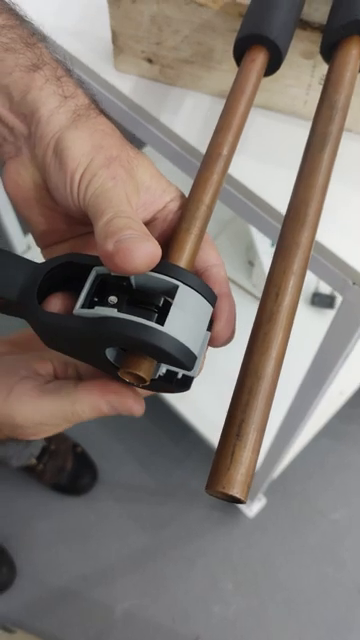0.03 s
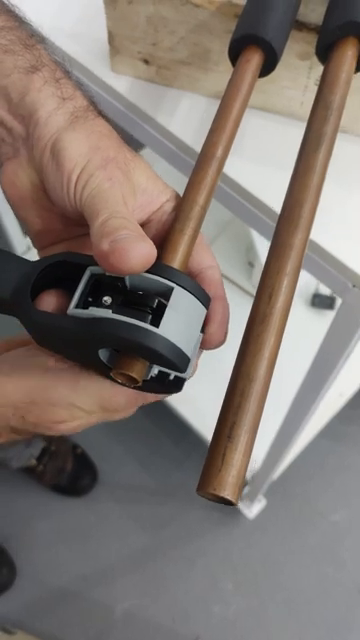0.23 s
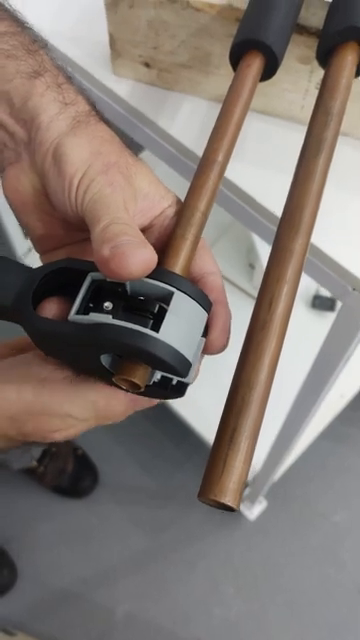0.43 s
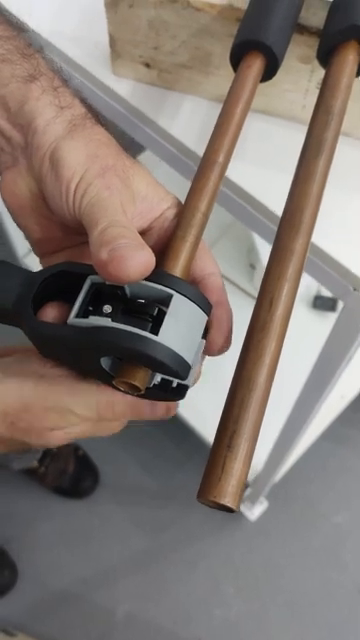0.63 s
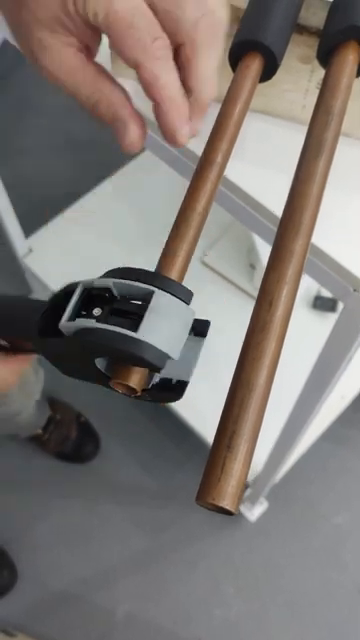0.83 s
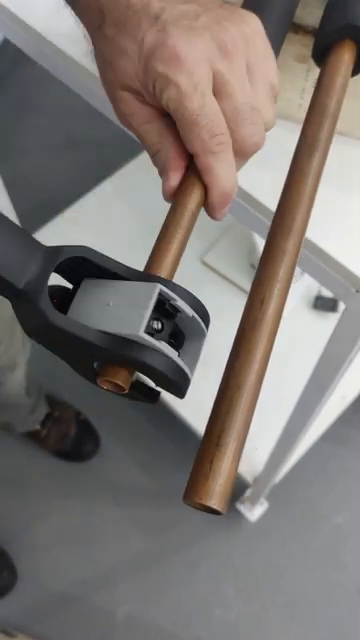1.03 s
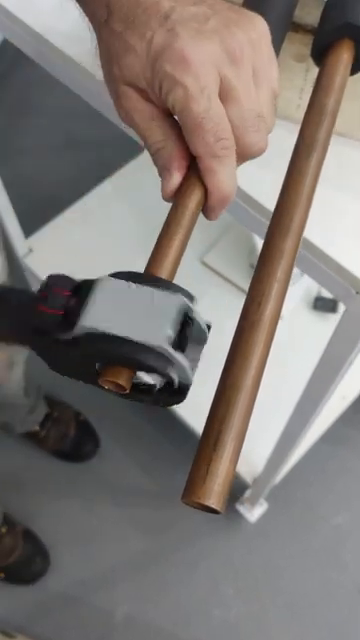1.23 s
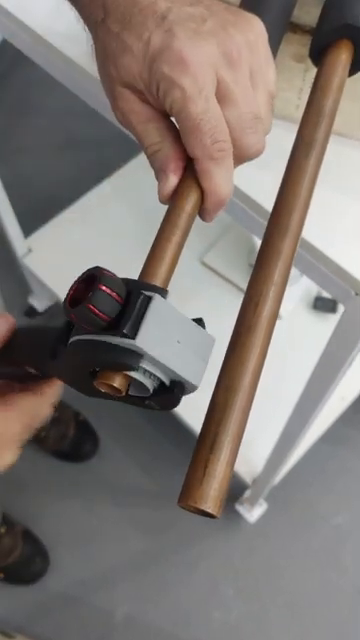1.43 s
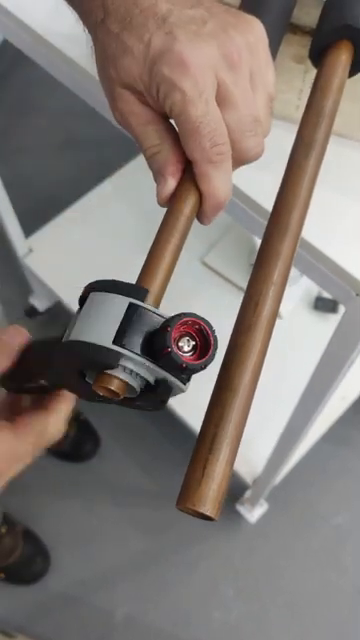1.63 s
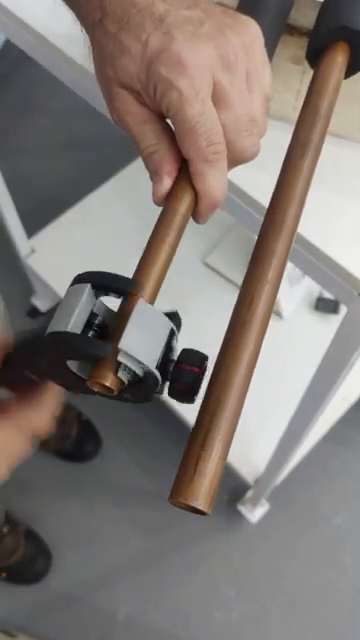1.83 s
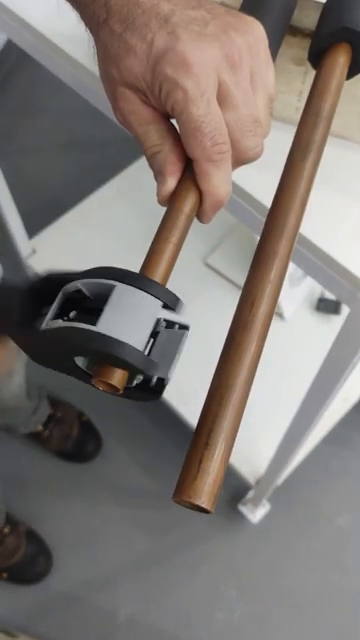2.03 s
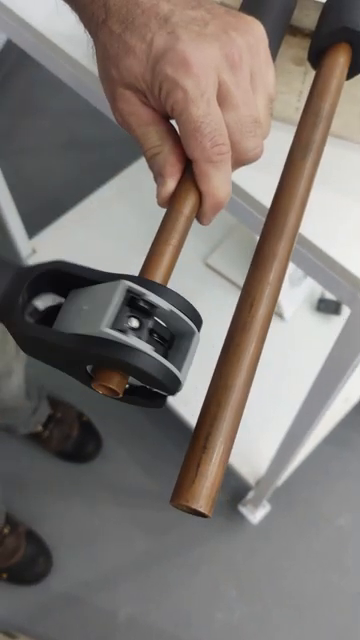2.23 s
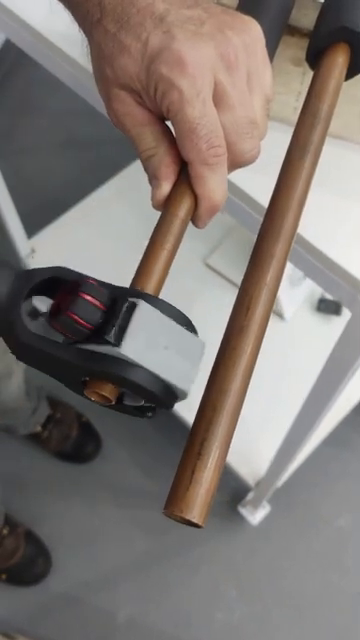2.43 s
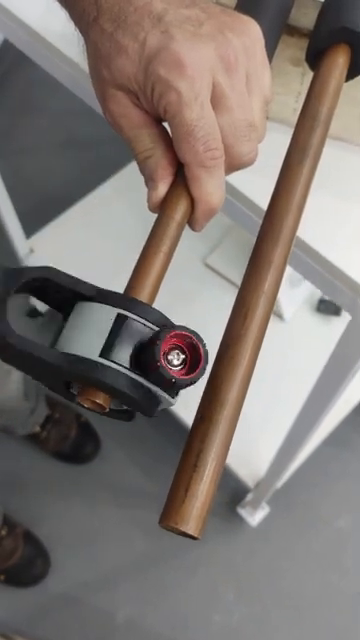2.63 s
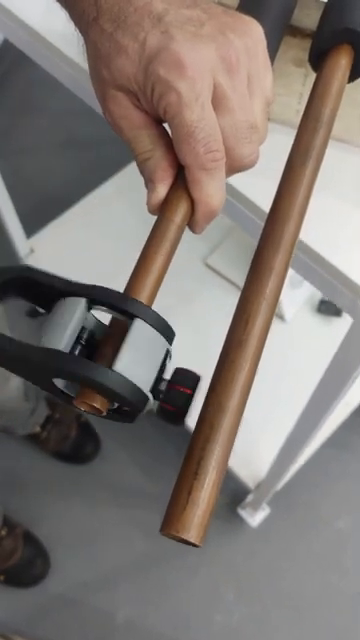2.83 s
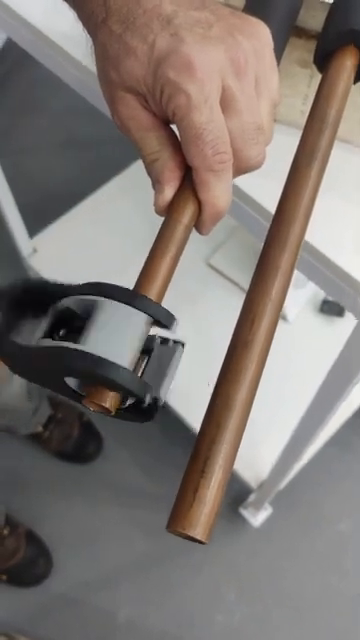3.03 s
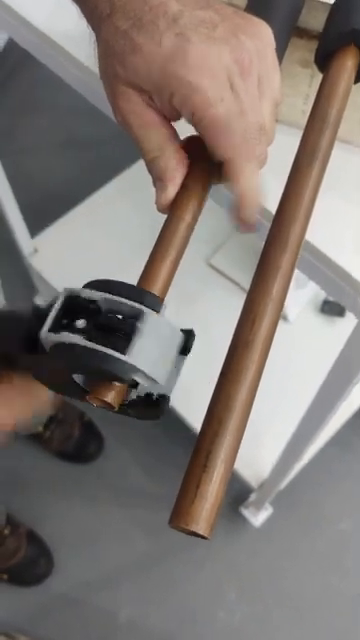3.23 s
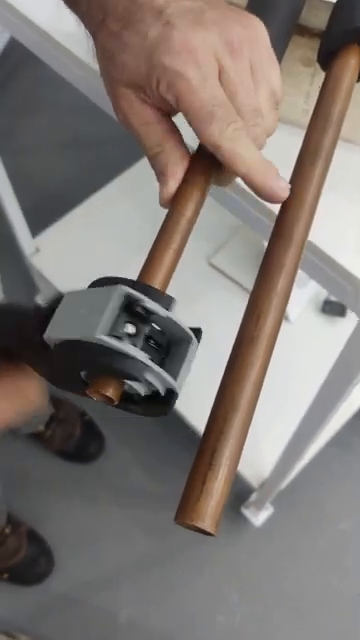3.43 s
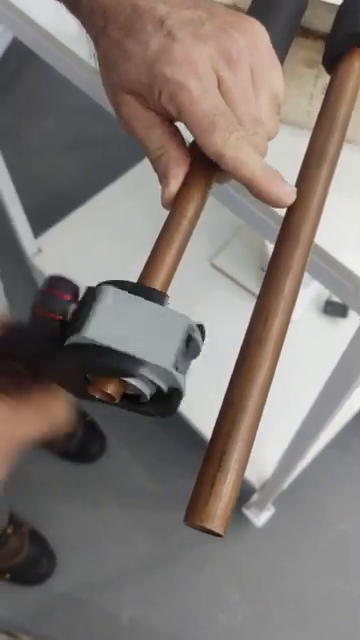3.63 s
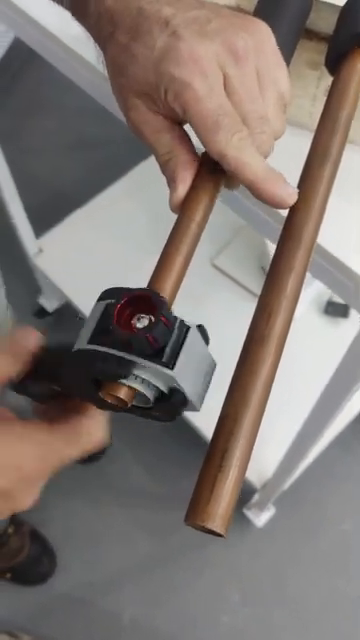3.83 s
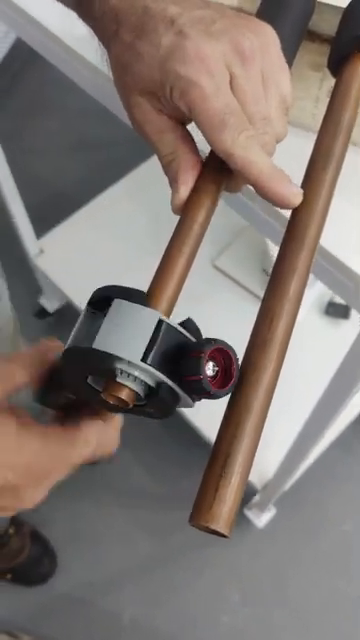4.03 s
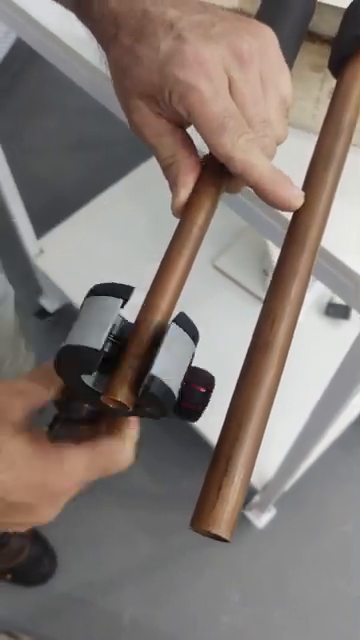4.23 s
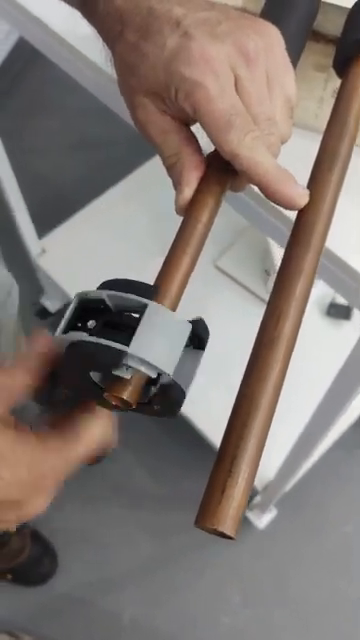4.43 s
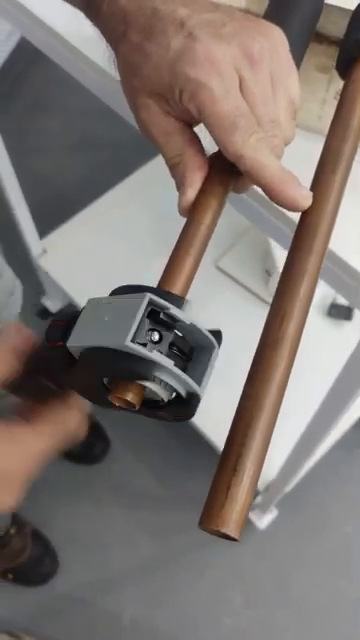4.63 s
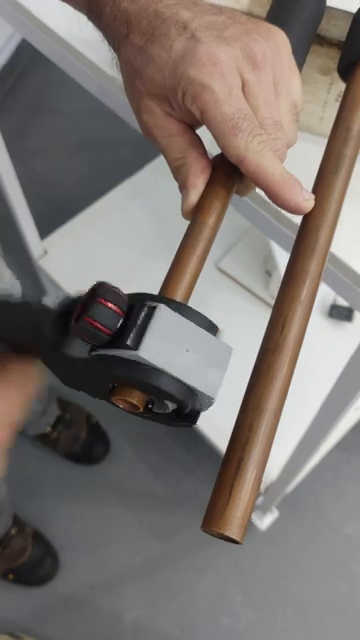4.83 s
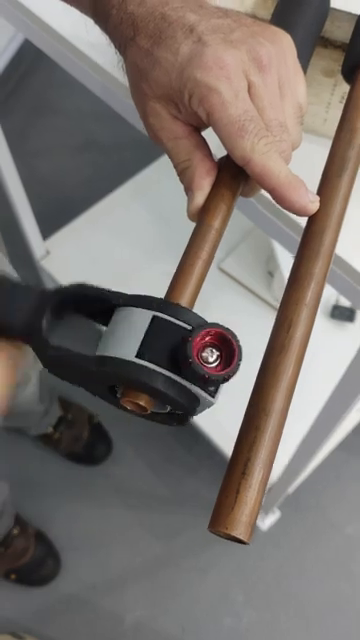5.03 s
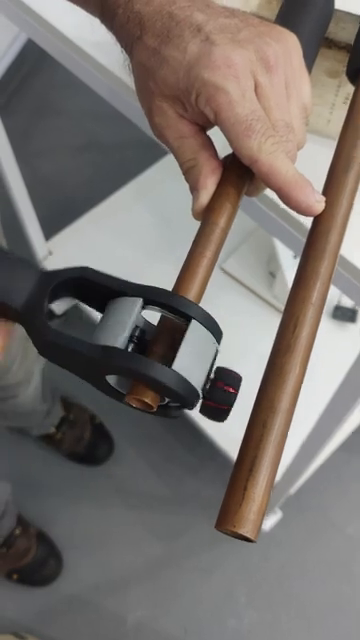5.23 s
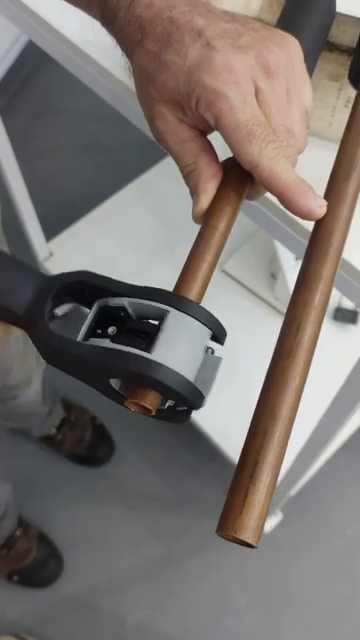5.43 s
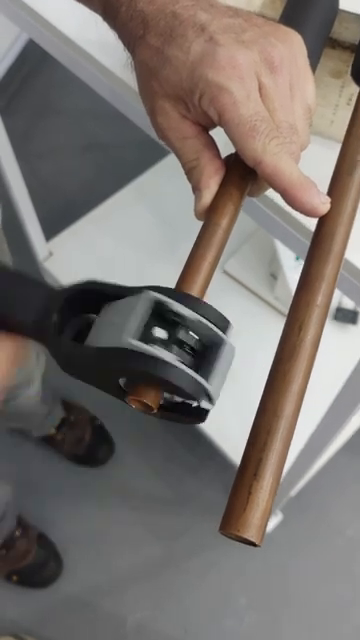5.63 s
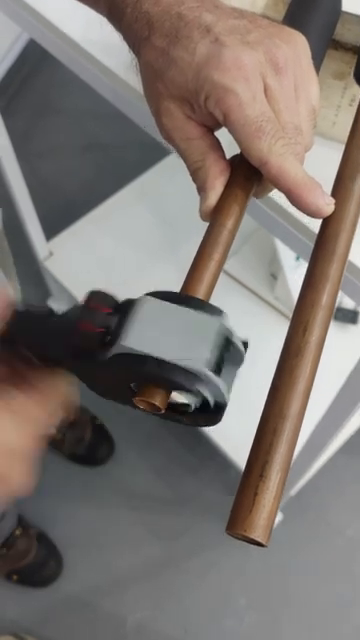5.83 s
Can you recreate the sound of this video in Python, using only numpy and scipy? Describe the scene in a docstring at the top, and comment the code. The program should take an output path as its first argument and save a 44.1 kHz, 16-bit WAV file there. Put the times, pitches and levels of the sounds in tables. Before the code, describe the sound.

Bright, crisp ratchet clicks come in quick small clusters, four or five clusters a second, with a few metallic knocks in a hard-walled workshop.

```python
"""Fingers brush a tool over quiet workshop air; then a ratcheting tube cutter swings round a copper tube.
A short grainy hiss swells just before each group of one to five pawl snaps: short noise bursts in a body
colour, with low thuds. Now and then the knob knocks the next tube: resonant noise, ringing sines, bounces.
Hard walls add a bright tail of decaying noise; rumble and a faint sine hum lie below. Two microphone
ports, an arm's length away, colour it all differently."""
import sys
import numpy as np
from scipy import signal
from scipy.fft import rfft, irfft
from scipy.io import wavfile
from scipy.ndimage import uniform_filter1d

SR = 44100
rng = np.random.default_rng(int(sys.argv[2]) if len(sys.argv) > 2 else 0)


def inscribe(sig):
    """Save sig as 16-bit PCM at rate SR to the path in sys.argv[1].

    A 1-D sig is mono; a 2-D sig holds one channel per row.
    Samples are clipped to [-1, 1] before scaling.
    """
    pcm = np.round(np.clip(np.atleast_2d(sig).T, -1, 1) * 32767)
    wavfile.write(sys.argv[1], SR, pcm.astype(np.int16))


def gain_from_db(level_db):
    """Convert decibel levels to linear amplitude factors (20 dB per decade)."""
    decades = np.asarray(level_db, float) / 20
    return 10 ** decades


N = 260190

# All levels are set ahead of the port colours.
# pawl snaps: (time [s], relative level [dB], lift of the lower body range [dB], relative tube thud [dB])
SNAPS = [(0.9488, -14, -1, -52), (0.967, -10, -2.5, -41.5), (1.235, -10.5, -1.5, -41.5),
         (1.261, -20, 7, -50), (1.2652, -13.5, 2, -49), (1.475, -12, 0.5, -54), (1.6957, -11, 5.5, -63),
         (1.71, -14, 7, -39.5), (1.74, -27, -8, -69), (1.923, -11, 7.5, -47), (1.94, -12, -6, -50),
         (2.1542, -16.5, 2.5, -45), (2.1695, -30, 5, -41.5), (2.1856, -12, 0, -49), (2.372, -13, 5.5, -68),
         (2.3882, -12.5, -2, -44), (2.4071, -14, 3, -55), (2.5825, -9.5, -1.5, -48), (2.597, -21, 8, -42),
         (2.603, -11.5, -1.5, -47), (2.7908, -12, -2, -41.5), (2.8127, -16, 2, -48),
         (2.8351, -13.5, 4.5, -44.5), (3.0235, -14, 4.5, -40.5), (3.2517, -9.5, -8, -61),
         (3.2567, -17, 11.5, -44.5), (3.4746, -13, 1.5, -61), (3.4921, -12.5, 0.5, -44),
         (3.6616, -9.5, 1, -39), (3.679, -10.5, -7.5, -41), (3.877, -8.5, 0.5, -43.5),
         (3.8906, -14.5, -8.5, -42), (4.0653, -18.5, 3, -49.5), (4.074, -24, -1, -51), (4.087, -21, 0, -53),
         (4.0972, -14, -8, -43.5), (4.1186, -16, 3, -54), (4.3014, -14.5, 1, -43.5),
         (4.5239, -6, -2.5, -43), (4.542, -17, 9, -40.5), (4.5511, -14.5, 9, -52),
         (4.7345, -11.5, 1, -46.5), (4.758, -12, 4.5, -45), (4.9526, -11, 8, -55),
         (4.9677, -15.5, 9.5, -49.5), (4.9756, -12.5, -6, -47.5), (5.1603, -11.5, 3.5, -46),
         (5.1735, -10.5, -2, -40), (5.2005, -14.5, -2.5, -66), (5.3806, -14, 13, -52),
         (5.3951, -11.5, -0.5, -43), (5.6163, -8.5, -1.5, -38.5), (5.632, -10, -3, -44),
         (5.836, -13.5, 10.5, -45), (5.8422, -14.5, -2, -43), (5.864, -14, 5, -48)]
# groups of snaps:
# (start of the hiss before them [s], hiss level [dB], hiss rise [ms], first snap as sent to the walls [dB])
SNAP_GROUPS = [(0.935, -43, 9.8, -10.5), (1.214, -32.5, 11, -9), (1.454, -29.5, 10, -7.5),
               (1.675, -33.5, 11, -8), (1.906, -32.5, 1.8, -12.5), (2.137, -32, 13, -9.5),
               (2.358, -32, 2.2, -11), (2.566, -29.5, 6.1, -10.5), (2.77, -29.5, 6, -9.5),
               (3.004, -30, 4.1, -11), (3.225, -36, 2.5, -8.5), (3.454, -34.5, 11, -12),
               (3.644, -30.5, 7.4, -13), (3.857, -28.5, 3, -8.5), (4.063, -32, 1.5, -9),
               (4.283, -28.5, 14.5, -9.5), (4.508, -29.5, 11, -10), (4.711, -27.5, 7.4, -13.5),
               (4.936, -25, 13, -11), (5.143, -30.5, 8.5, -10), (5.363, -33.5, 2.2, -13.5),
               (5.594, -28.5, 17, -10), (5.81, -32, 3.3, -15)]
# colour of a snap in the cutter body: (frequency [Hz], level [dB])
BODY = [(300, -22.5), (900, -22.5), (1300, -17), (2000, -13), (2700, -7.5), (3400, -1.5), (4100, -3),
        (5200, 1.5), (8000, 1), (16000, 2.5)]
# knocks and small ticks of handle and knob:
# (time [s], relative level [dB], centre frequency [Hz], relative level sent to the walls [dB])
KNOCKS = [(.077, -51, 3000, -46), (.786, -51, 6000, -54), (.9, -50, 1300, -49), (1.176, -35, 1990, -34),
          (1.188, -40, 3000, -43), (1.423, -33.5, 1454, -37), (1.653, -37.5, 2330, -40),
          (1.797, -16.5, 2300, -9.5), (2.53, -38.5, 1700, -39), (2.888, -11, 2300, -8.5),
          (3.431, -41.5, 2400, -36), (3.825, -33, 1970, -38.5), (3.999, -19, 2100, -11.5),
          (4.152, -26, 2300, -17.5), (4.377, -38.5, 1720, -39.5), (4.896, -39, 1690, -38),
          (5.261, -19.5, 2130, -10), (5.323, -33, 2200, -41), (5.575, -34, 3000, -32),
          (5.784, -38, 2400, -34)]
# ringing modes of the tube struck by the knob: (frequency [Hz], level under the blow [dB], t60 [s])
TUBE_MODES = [(2300, -31, 0.071), (2620, -23, 0.034), (3340, -25, 0.065), (3990, -30, 0.053),
              (6260, -26, .08), (13560, -33, .12)]
# fingers shifting on the tool: (time [s], level [dB], half length [s])
FINGERS = [(.04, -75.5, 0.086), (0.277, -64, 0.04), (0.563, -80, 0.019), (.658, -72, 0.013),
           (.8, -86, 0.045), (0.908, -72, 0.075)]
# room tail by range: (centre frequency [Hz], t60 [s], relative level [dB])
ROOM_BANDS = [(184, 0.55, -1.5), (470, 0.47, -5), (1110, 0.48, 0), (2380, 0.4, -0.5), (4100, 0.39, 1),
              (6430, 0.35, -1), (9400, 0.28, 2.5), (15300, 0.24, -4)]
# spectrum of the workshop air: (frequency [Hz], relative level [dB])
AIR_COLOUR = [(40, -40), (100, -27), (190, -3), (250, -5.5), (300, -8), (780, -13), (2000, -11),
              (4000, -19.5), (8000, -26.5), (12000, -14), (16000, -23.5)]
# cavity resonance of each microphone port: (frequency [Hz], level [dB])
PORT_LEFT = [(100, 3), (1500, -1.5), (5000, 0.5), (6200, -1), (7000, 3.5), (8000, 14), (9000, 4),
             (10500, -3.5), (13000, -11.5), (15600, -13), (15900, -51), (17000, -60)]
PORT_RIGHT = [(100, 0), (1500, -0.5), (3400, 5), (4500, 3.5), (5700, 4.5), (6300, 4.5), (7400, 9.5),
              (8300, -2), (10000, -3.5), (12000, -5.5), (15000, -0.5), (15600, 3), (15900, -26),
              (17000, -43)]
GRID_HZ = np.linspace(0, SR / 2, 513)

PORT_LAG = 5  # samples by which snaps and knocks reach the right port late
PLACES = 4  # the tool swings, so its echoes change from blow to blow
WORK_START_S = 0.92  # brushing stops and the rumble grows


def pawl():
    """A sprung pawl rattles into the cutter body and thuds through the tube; gives direct pair and wall sends."""
    later_snap_room_db = -3  # later snaps of a group reach the walls weaker
    pan_db, pan_spread_db = 2.7, 0.98  # each port above or below the middle
    thud_hz, thud_width_hz, thud_decay_ms = 202, 283.0, 6.4
    near, send = np.zeros((2, N)), np.zeros((PLACES, N))
    ms = np.arange(SR // 25) / SR * 1000
    snaps, groups = np.array(SNAPS), np.array(SNAP_GROUPS)
    room_db = snaps[:, 1] + later_snap_room_db
    first_snaps = np.searchsorted(snaps[:, 0], groups[:, 0])
    room_db[first_snaps] = groups[:, 3]
    # the spring makes the pawl chatter for a few ms
    chatter = ms ** 0.87 * np.exp(-ms / 0.9776)
    click = 1. * (ms == 0)
    for k, (s, db, low_db, thud_db) in enumerate(SNAPS):
        # bench reflections reach each port differently
        both, left, right, jolt, *shake = rng.standard_normal((6, len(ms)))
        rattle = (both + 0.98 * np.array([left, right])) * chatter
        snap = unit(body(rattle, low_db)) * gain_from_db(db + 15.5)
        push = (jolt + 0.82 * np.array(shake)) * np.exp(-ms / thud_decay_ms)
        thud = unit(reson(push, thud_hz, thud_width_hz)) * gain_from_db(thud_db + 23.0)
        # the tool faces a new way each time
        pan = pan_db + pan_spread_db * rng.standard_normal()
        add(near, s, snap * gain_from_db([[pan], [-pan]]) + thud)
        to_walls = unit(body(click, 0.33 * low_db)) * gain_from_db(room_db[k] + 15.5)
        add(send[k % PLACES], s, to_walls + gain_from_db(-9.0) * thud[0])
    return near, send


def lead_in_hiss():
    """A short grainy hiss in the body colour swells just before the first snap of each group."""
    t, gain, snap_times = np.arange(N) / SR, np.zeros(N), np.array(SNAPS)[:, 0]
    for s, db, rise_ms, _ in SNAP_GROUPS:
        end = snap_times[snap_times > s][0]
        full = min(s + rise_ms / 1000, end - .001)
        times = [s - .002, s, full, end, end + 0.016]
        levels = [db - 43, db - 16, db, db, db - 13]
        gain += gain_from_db(np.interp(t, times, levels, -np.inf, -np.inf))
    hiss = body(rng.standard_normal((2, N)) * gain_from_db(2.7 * walk(400)))
    return hiss / hiss.std() * gain


def blow_colour(x, hz, upper_db):
    """Broad resonances of a knock: its own centre, less an upper and a low ring, in a wide hump."""
    centre = reson(reson(x, hz, 0.93 * hz), hz, 1.16 * hz)
    upper = gain_from_db(upper_db) * reson(x, 5900.0, 1020.0)
    low = gain_from_db(-7.0) * reson(x, 360.0, 780.0)
    return reson(centre - upper - low, 2130.0, 11500.0)


def knob():
    """Duller blows: a short push through a broad resonance rings the copper a little and rattles on."""
    bounces, bounce_span_s = 5, 0.038
    bounce_db, bounce_fade_db = -10, -3.5  # first level, change over the span
    near, send = np.zeros((2, N)), np.zeros((PLACES, N))
    t = np.arange(SR // 5) / SR
    click = 1. * (t == 0)
    for k, (s, db, hz, room_db) in enumerate(KNOCKS):
        upper_db = 6. + .6 * room_db  # harder blows ring brighter
        noise = rng.standard_normal(len(t)) + 0.86 * rng.standard_normal((2, len(t)))
        blow = peak(blow_colour(noise * np.exp(-t / 0.0024), hz, upper_db), db)
        ring = np.zeros(len(t))
        for mode_hz, mode_db, t60 in TUBE_MODES:
            phase = rng.random() * 2 * np.pi
            ring += gain_from_db(db + mode_db) * np.sin(2 * np.pi * mode_hz * t + phase) * 1000. ** (-t / t60)
        add(near, s, (blow + ring) * gain_from_db([[-3.5], [-1.1]]))
        to_walls = unit(blow_colour(click, hz, upper_db)) * gain_from_db(db + 6.5) + ring
        add(send[k % PLACES], s, to_walls * gain_from_db(room_db - db))
        # the knocked part rattles on, its two ports swapped
        for when, loss in rng.random((bounces, 2)):
            level = room_db - db + bounce_db + bounce_fade_db * when - 4.7 * loss
            add(near, s + .004 + when * bounce_span_s, blow[::-1] * gain_from_db(level))
    return near, send


def fingers():
    """Skin and plastic brushing: grainy hiss in the body resonances, until the work starts."""
    t = np.arange(N) / SR
    gain = gain_from_db(-77)  # faint brushing throughout
    for s, db, half in FINGERS:
        gain = gain + gain_from_db(db) * np.exp(-((t - s) / half) ** 2)
    grains = rng.standard_normal((2, N)) * gain_from_db(1.7 * walk(169.6))
    hiss = reson(body(grains, 6.7), 4700.0, 4000.)
    return hiss / hiss.std() * gain * (t < WORK_START_S)


def room(x):
    """Dense echoes that fill in after the first walls answer, then die faster in the treble."""
    size, room_db, fill_s = SR, -30.5, 0.13
    t, hz, noise = np.arange(size) / SR, np.arange(size // 2 + 1) * 1., pair(size)
    centres, tail = np.log([band[0] for band in ROOM_BANDS]), 0
    for k, (_, t60, db) in enumerate(ROOM_BANDS):
        share = np.interp(np.log(hz + 1), centres, np.arange(len(ROOM_BANDS)) == k)
        tail = tail + gain_from_db(db) * irfft(noise * share, size) * 1000. ** (-t / t60)
    fill = 0.48 + 0.85 * (1 - np.exp(-(t / fill_s) ** 2))
    tail = tail * fill * (t > .003)
    # the early echoes are still separate, so they come in lumps
    lumps_db = 2.5 * np.exp(-t / 0.17) * np.clip(t / 0.034, 0, 1) * walk(300)[:size]
    return gain_from_db(room_db) * signal.fftconvolve(x[None], tail * gain_from_db(lumps_db), axes=1)[:, :N]


def floor():
    """Steady noise for workshop air, low resonant noise that comes and goes, a sine hum that wavers in level."""
    air_db, rumble_idle_db, rumble_db = -67.5, -69.5, -67
    hum_hz, hum_on_s, hum_rise_s, hum_settle_s = 239.5, 0.27, .1, 0.4
    hum_idle_db, hum_start_db, hum_steady_db = -81, -70, -77
    hz, t = np.arange(N // 2 + 1) * SR / N, np.arange(N) / SR
    air = irfft(pair(N) * gain_from_db(along(AIR_COLOUR, hz)), N)
    rumble = reson(reson(irfft(pair(N), N), 230.0, 530.0), 295.0, 910.0)
    # the tool starts to shake the bench
    swell_db = np.where(t < WORK_START_S, rumble_idle_db, rumble_db) + 1.2 * walk(3.02) + 2.0 * walk(11)
    rumble = rumble / rumble.std() * gain_from_db(swell_db)
    hum_times = [0, hum_rise_s, hum_rise_s + hum_settle_s]
    hum_db = np.interp(t - hum_on_s, hum_times, [hum_idle_db, hum_start_db, hum_steady_db])
    hum = np.sqrt(2) * gain_from_db(hum_db + 2.9 * walk(9)) * np.sin(2 * np.pi * hum_hz * t)
    return air / air.std() * gain_from_db(air_db) + rumble + hum


def body(x, low_db=0):
    """The body colour, with the lower range raised or lowered for each sound."""
    split_hz = 7800
    ir = causal(along(BODY, GRID_HZ) + low_db / (1 + (GRID_HZ / split_hz) ** 4))
    ir = ir.reshape((1,) * (x.ndim - 1) + (-1,))
    return signal.fftconvolve(x, ir, axes=-1)[..., :x.shape[-1]]


def pair(size):
    """Two noises, alike in the bass and unrelated in the treble, as spectra."""
    alike_hz = 486
    a, b = rfft(rng.standard_normal((2, size)))
    alike = np.exp(-np.arange(len(a)) * SR / size / alike_hz)
    shared, apart = np.sqrt(1 + alike) * a, np.sqrt(1 - alike) * b
    return np.array([shared + apart, shared - apart])


def walk(rate):
    """Random levels held 1 / rate s and smoothed twice."""
    k = int(SR / rate)
    steps = np.repeat(rng.standard_normal(N // k + 1), k)
    return 1.91 * uniform_filter1d(uniform_filter1d(steps, k), k)[:N]


def reson(x, hz, width):
    """Two-pole resonance, gain 1 at the centre; width in Hz."""
    return signal.lfilter(*signal.iirpeak(hz, hz / width, fs=SR), x)


def causal(db):
    """Minimum-phase impulse response of a level given at 513 frequencies."""
    cepstrum = irfft(db * np.log(10) / 20)
    cepstrum[1:512] *= 2
    cepstrum[513:] = 0
    return irfft(np.exp(rfft(cepstrum)))[:512]


def along(table, hz):
    """Reads a (frequency [Hz], value) table on a log-frequency axis."""
    f, v = np.transpose(table)
    return np.interp(np.log(hz + 1), np.log(f + 1), v)


def unit(x):
    """Scales to energy 1, averaged over the channels."""
    return x / np.sqrt(np.mean(np.sum(x ** 2, axis=-1)))


def peak(x, db):
    """Sets the highest sample."""
    return x * gain_from_db(db) / np.abs(x).max()


def add(out, s, x):
    """Mixes a short sound in at a time in seconds."""
    i = int(s * SR)
    out[..., i:i + x.shape[-1]] += x[..., :N - i]


def scene():
    """Direct sound, room and floor at the two ports."""
    (snaps, snap_send), (knocks, knock_send) = pawl(), knob()
    near = snaps + knocks
    near = np.array([near[0], np.roll(near[1], PORT_LAG)])
    echoes = sum(room(x) for x in snap_send + knock_send)
    return near + lead_in_hiss() + echoes + fingers() + floor()


def band_limit(x):
    """A steep low-pass at the top of the band."""
    return signal.sosfilt(signal.butter(12, 16970, fs=SR, output="sos"), x)


def record(dry):
    """Each port colours the sound; the bass is cut and the loudest snaps are rounded."""
    low_cut_hz, ceiling = 167, 0.68
    ports = [causal(along(table, GRID_HZ)) for table in (PORT_LEFT, PORT_RIGHT)]
    coloured = np.array([signal.fftconvolve(x, port)[:N] for x, port in zip(dry, ports)])
    low_cut = signal.butter(2, low_cut_hz, "high", fs=SR, output="sos")
    thinned = signal.sosfilt(low_cut, coloured)
    return band_limit(ceiling * np.tanh(thinned / ceiling))


dry = scene()
out = record(dry)
inscribe(out)
```